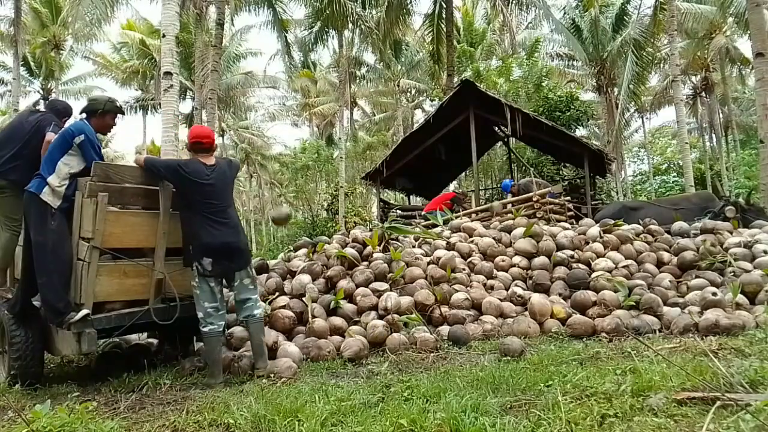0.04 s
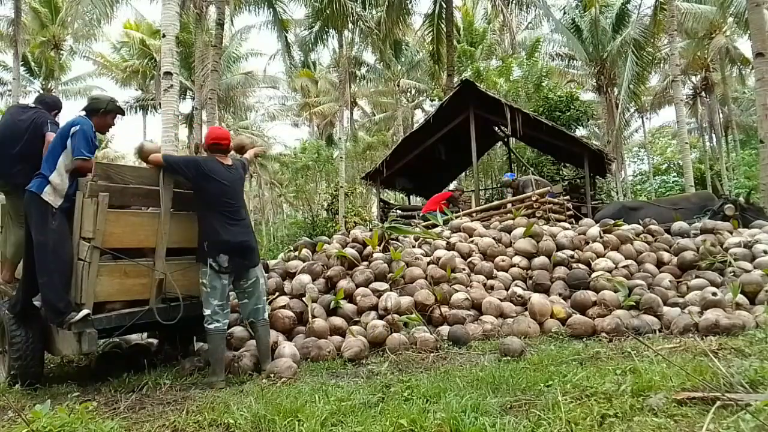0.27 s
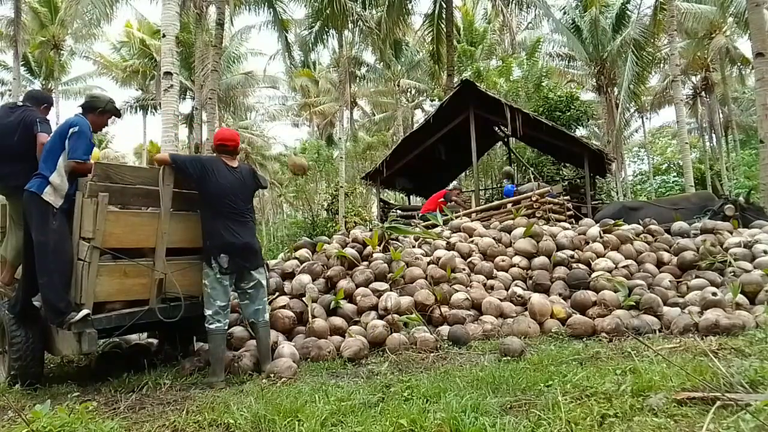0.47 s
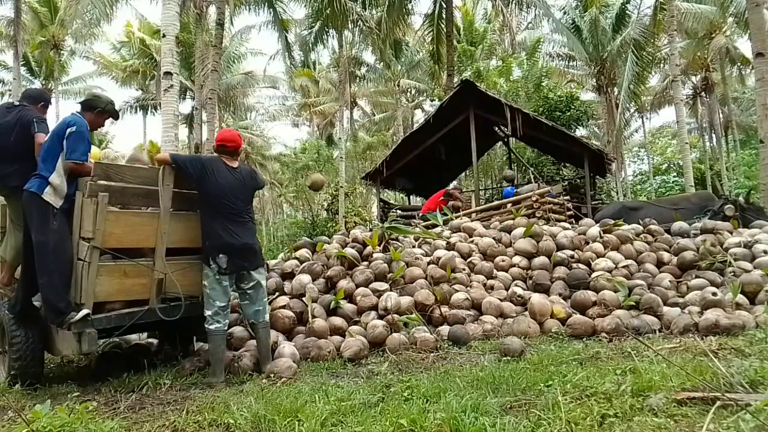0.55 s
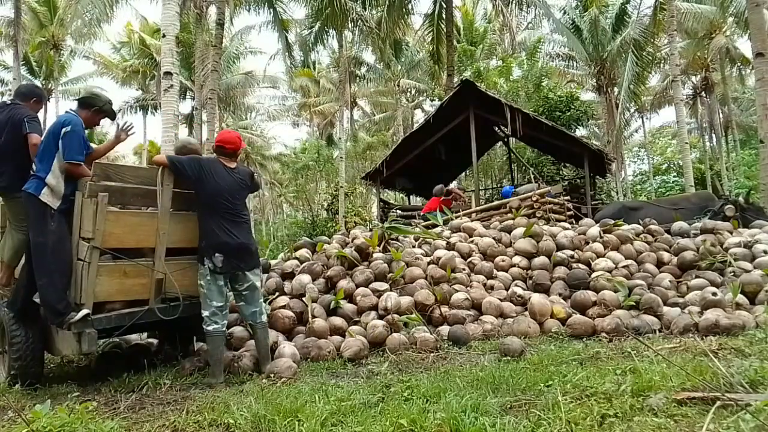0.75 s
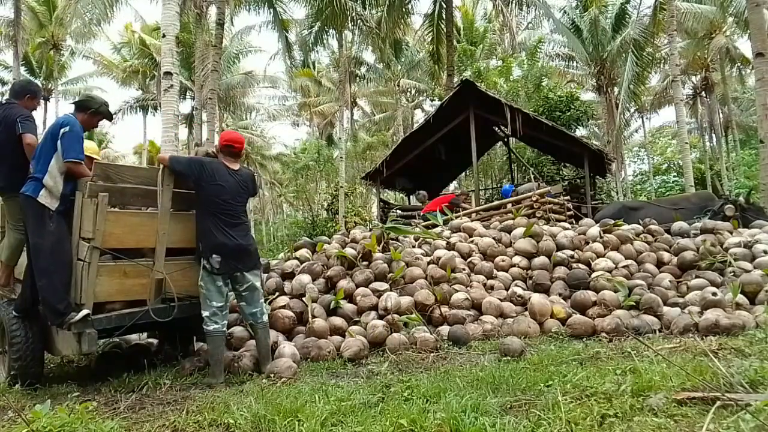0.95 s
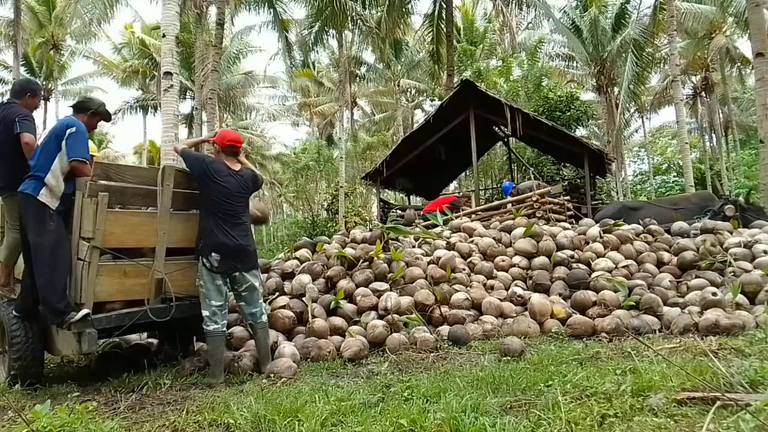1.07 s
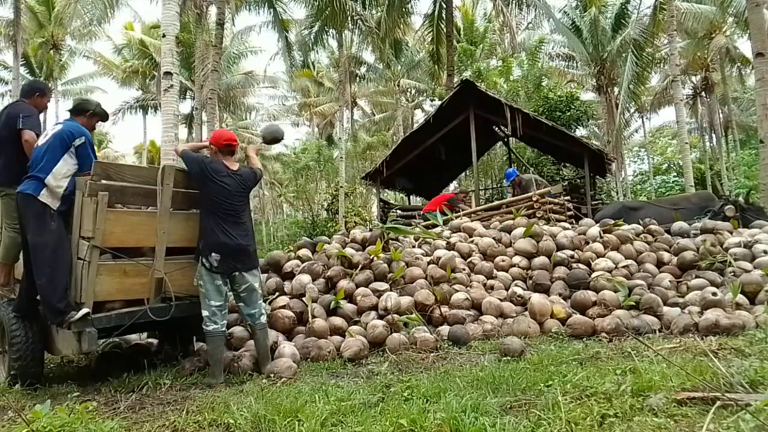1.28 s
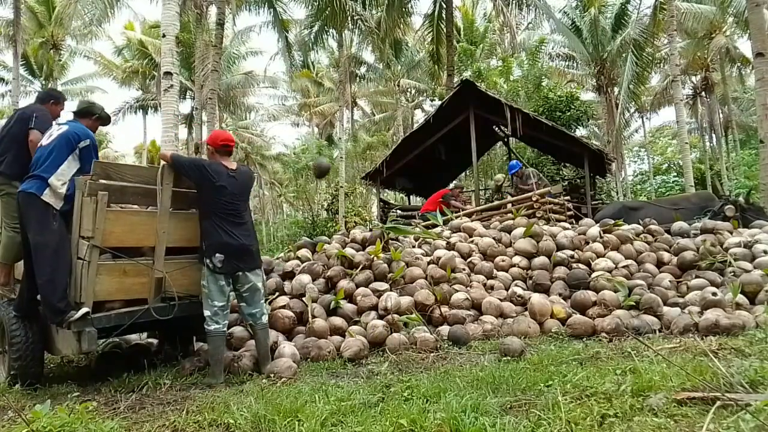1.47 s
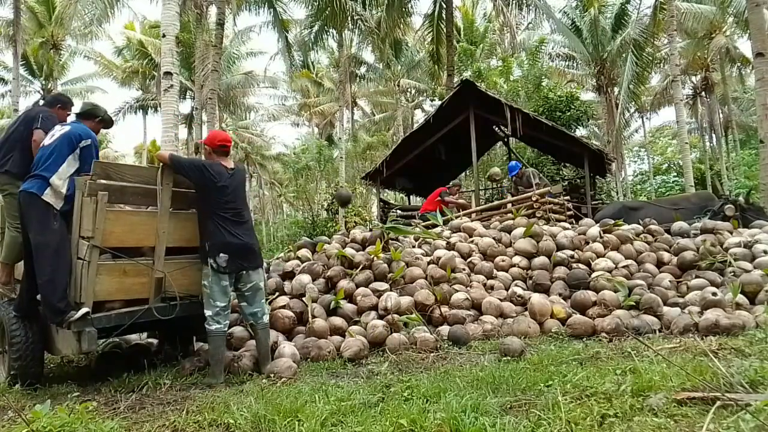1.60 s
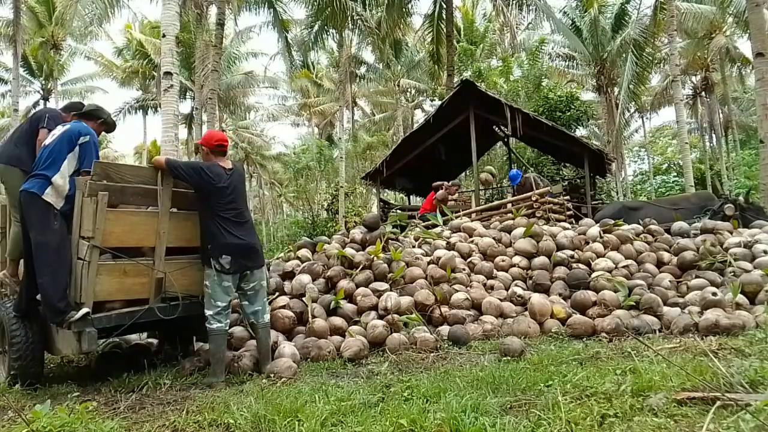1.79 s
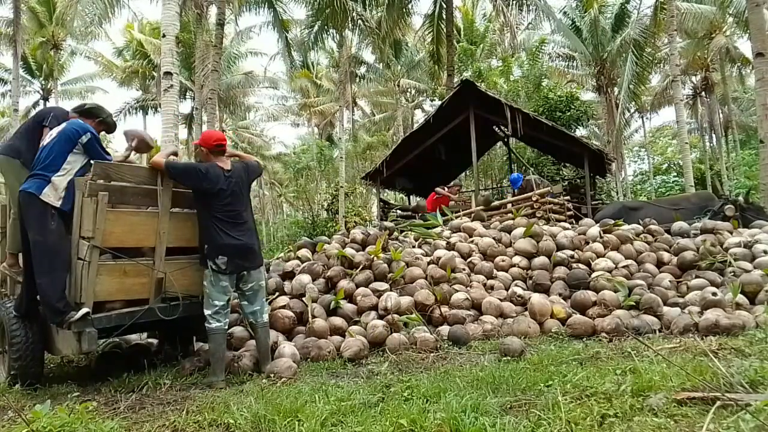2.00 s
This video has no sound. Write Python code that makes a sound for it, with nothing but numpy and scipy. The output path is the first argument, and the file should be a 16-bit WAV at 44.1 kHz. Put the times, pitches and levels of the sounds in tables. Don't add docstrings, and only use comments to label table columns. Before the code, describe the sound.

Hollow coconut knocks on a slatted wooden cart, sharp husk cracks, faint rustle and leaf hiss

```python
import sys
import numpy as np
from scipy import signal
from scipy.fft import rfft, irfft, next_fast_len
from scipy.io import wavfile
from scipy.ndimage import uniform_filter1d

SR = 44100
rng = np.random.default_rng(int(sys.argv[2]) if len(sys.argv) > 2 else 0)


def how_loud(loudness_db):
    steps = np.asarray(loudness_db, float) / 20
    return 10 ** steps


def generate_wav(signal):
    frames = np.transpose(np.atleast_2d(signal))
    scaled = np.clip(frames, -1, 1) * 32767
    pcm = np.round(scaled).astype(np.int16)
    wavfile.write(sys.argv[1], SR, pcm)


N = 90404


def unit(x):
    return x / np.sqrt(np.mean(x ** 2) + 1e-20)


def along(points, hz):
    f, value = np.transpose(points)
    return np.interp(np.log(hz + 1), np.log(f + 1), value)


def filtered(x, response):
    size = next_fast_len(N + SR // 2)
    hz = np.fft.rfftfreq(size, 1 / SR)
    return irfft(rfft(x, size) * response(hz), size)[..., :N]


def noise(spectrum, patchy_db):
    top_hz = 15950
    cells = signal.stft(rng.standard_normal(N), nperseg=512)[2]
    patches = uniform_filter1d(rng.standard_normal(cells.shape), 6, 0)
    patches = unit(uniform_filter1d(patches, 10, 1))
    x = signal.istft(cells * how_loud(patchy_db * patches), nperseg=512)[1][:N]
    return unit(filtered(x, lambda hz: how_loud(along(spectrum, hz)) * (hz < top_hz)))


def ringing(rows, modes, rise_s, gain_db, chatter_db, damp, radiates=0.77):
    detune, mode_spread_db = 0.048, 1.8
    taps_per_s, chatter_lasts = 2500, 2.09
    travel_s = 0.001079
    out, t = np.zeros(N + SR), np.arange(SR // 7) / SR
    tap_t = t[:SR // 10]
    for s, db, hz, t60 in rows:
        ring = np.zeros(len(t))
        for ratio, level_db, share in modes:
            tune, size = rng.standard_normal(2) * (ratio != 1)
            decay = how_loud(level_db + mode_spread_db * size - 60 * t / (damp * t60 * share))
            ring += decay * np.sin(2 * np.pi * hz * ratio * (1 + detune * tune) * t)
        hit, sign = rng.random((2, len(tap_t)))
        taps = (hit < taps_per_s / SR) * (2 * sign - 1)
        taps = taps * how_loud(chatter_db - 60 * tap_t / (chatter_lasts * t60))
        taps[0] = 1
        sound = signal.fftconvolve(ring * (1 - np.exp(-t / rise_s)), taps)[:len(t)]
        sound = signal.lfilter(*signal.butter(3, radiates * hz, "high", fs=SR), sound)
        out[round((s + travel_s) * SR):][:len(t)] += how_loud(db + gain_db) * sound
    return out[:N]


# time in seconds, level in dB.
SETTLING = [(0, -50), (.1, -52), (.2, -54.5), (.235, -44), (.265, -48.5), (0.299, -38), (.335, -48.5),
            (.45, -56), (.8, -75), (.86, -59), (.9, -44.5), (.97, -49.5), (1.03, -41.5), (1.12, -54.5),
            (1.25, -49), (1.4, -53), (1.75, -55.5), (2.05, -59.5)]
# frequency in Hz, level in dB.
FIBRE_COLOUR = [(100, -16), (300, -7), (700, -6), (1500, -5), (3000, -3.5), (5000, -8), (9000, -8),
                (14000, -6.5)]


def rustle():
    gain_db, growth, grain_db = -5.5, 1, 2
    s, db = np.transpose(SETTLING)
    peak_db = db.max()
    level_db = np.interp(np.arange(N) / SR, s, db)
    grain = unit(uniform_filter1d(rng.standard_normal(N), size=90))
    rubbing = unit(how_loud(grain_db * grain) * noise(FIBRE_COLOUR, patchy_db=1.1))
    return how_loud(peak_db + gain_db + growth * (level_db - peak_db)) * rubbing


# frequency in Hz, level in dB.
LEAF_COLOUR = [(45, -19), (140, 7.5), (320, 5), (1400, 3), (4100, -5), (9200, -5), (12600, -19),
               (16100, -12)]


def leaves():
    return how_loud(-53) * noise(LEAF_COLOUR, patchy_db=2.5)


# start in seconds,
# peak in dB, pitch in Hz, t60 in seconds.
SHELL_KNOCKS = [(0.021, -45.5, 856, 0.03), (0.076, -34.5, 1370, 0.03), (0.1972, -25.5, 1350, 0.05),
                (.2025, -28, 1480, 0.034), (0.207, -16, 1505, 0.024), (0.216, -39, 1740, 0.041),
                (0.2213, -16, 1430, 0.02), (0.246, -34.5, 1170, 0.025), (0.8227, -22.5, 1890, 0.02),
                (0.833, -20, 1420, 0.028), (0.961, -28, 800, 0.014), (0.9665, -30.5, 1293, 0.056),
                (1.012, -46, 1300, 0.029), (1.038, -44, 1360, 0.056), (1.262, -37.5, 1500, 0.062),
                (1.29, -25.5, 1120, 0.036), (1.293, -33, 586, 0.024), (1.316, -33, 570, 0.037),
                (1.364, -43, 1000, 0.06), (1.669, -33.5, 950, 0.035), (1.7645, -32, 1210, 0.065),
                (1.769, -32, 1495, 0.041), (1.806, -38, 1370, 0.056), (1.929, -39.5, 900, 0.041),
                (2.038, -34, 1120, 0.03),
                (0.2066, -17, 2640, 0.02), (0.2214, -25, 2710, 0.022), (0.8227, -23, 3160, 0.012),
                (.8326, -25.5, 2500, 0.025), (0.967, -30, 2530, 0.03), (1.7645, -32, 2600, 0.04),
                (1.663, -34.5, 840, 0.048), (1.771, -36.5, 604, 0.042), (0.362, -43, 1480, 0.028),
                (1.247, -43.5, 1530, 0.074), (1.2917, -28, 2900, 0.021), (1.2923, -29, 4150, 0.026)]
# ratio to the pitch, level in dB, share of t60.
SHELL_MODES = [(1, -1.5, 1), (1.189, -3, 0.88), (1.42, -4.5, 0.49), (1.9, -10.5, 1)]


def knocks():
    return ringing(SHELL_KNOCKS, SHELL_MODES, rise_s=0.000092, gain_db=-4.5,
                   chatter_db=-4.5, damp=0.34)


# frequency in Hz, t60 in seconds.
GROVE_DECAY = [(150, 0.26), (1500, 0.67), (4000, 0.91), (10000, 0.73)]


def grove(x):
    delay_s = 0.012
    out, size = np.zeros(N + SR), SR // 12
    bursts = rng.standard_normal((N // size + 1, SR // 3))
    hz, t, cells = signal.stft(bursts, SR, nperseg=256)
    decay = how_loud(-60 * t / along(GROVE_DECAY, hz)[:, None])
    tails = signal.istft(cells * decay, SR, nperseg=256)[1]
    for k, tail in enumerate(tails):
        echo = signal.fftconvolve(x[k * size:][:size], tail / np.linalg.norm(tail))
        out[k * size + round(delay_s * SR):][:len(echo)] += echo
    return how_loud(-14.5) * out[:N]


# start in seconds, peak in dB, pitch in Hz, t60 in seconds.
PLANK_THUDS = [(0.074, -39.5, 220, 0.04), (0.2192, -33, 149, 0.04), (0.249, -48, 210, 0.06),
               (0.294, -46, 152, 0.065), (0.673, -47, 267, 0.11), (0.8222, -34.5, 149, 0.046),
               (0.833, -31, 269, 0.046), (0.896, -49.5, 208, 0.16), (0.9612, -40, 205, 0.04),
               (.9635, -34, 165, 0.049), (0.99, -40, 270, 0.059), (1.263, -41.5, 301, 0.073),
               (1.289, -35, 224, 0.035), (1.308, -39, 228, 0.053), (1.334, -40, 203, 0.039),
               (1.354, -44, 188, 0.046), (1.413, -48, 263, 0.11), (1.455, -47.5, 236, 0.058),
               (1.663, -45, 264, 0.11), (1.684, -40, 322, 0.061), (1.764, -41, 212, 0.057),
               (1.805, -45.5, 332, 0.033), (1.873, -43.5, 217, 0.047), (1.888, -46, 241, 0.045),
               (1.925, -50, 131, 0.056)]
# ratio to the pitch, level in dB, share of t60.
PLANK_MODES = [(1, 1, 0.83), (1.52, -9, 0.97), (2.38, -12.5, 0.78), (0.762, -9.5, 1.7)]


def thuds():
    return ringing(PLANK_THUDS, PLANK_MODES, rise_s=0.00073, gain_db=2.5,
                   chatter_db=-16.0, damp=0.96, radiates=0.49)


# start in seconds, peak in dB, t60 in seconds, lowest frequency in Hz.
HUSK_SNAPS = [(0.076, -34, 0.0185, 1500), (.1984, -32, 0.01, 3000), (.2079, -1, 0.0024, 1500),
              (.2086, -10.5, .012, 2470), (0.2127, -19, 0.012, 5000), (.2148, -18.5, 0.016, 4000),
              (0.22, -22, .01, 6000), (0.2216, -24, 0.027, 6000), (.247, -38, .015, 6500),
              (0.8238, -14, 0.0051, 1490), (0.8238, -18, .018, 2510), (0.8274, -29, 0.034, 7000),
              (0.8343, -26, 0.012, 1500), (0.8359, -21.5, 0.011, 6500), (.8367, -19, .014, 7000),
              (0.962, -33, 0.04, 2500), (0.9673, -27, .012, 2500), (.969, -27.5, 0.015, 1510),
              (0.972, -31, .04, 4000), (1.2321, -20, 0.013, 7200), (1.2329, -23, 0.016, 7200),
              (1.2371, -25, 0.012, 7000), (1.24, -29, 0.017, 6800), (1.2704, -22, 0.014, 3600),
              (1.291, -25, 0.062, 2950), (1.2932, -21.5, 0.013, 3000), (1.2946, -27, 0.0086, 3000),
              (1.296, -25.5, .025, 3500), (1.3192, -30, 0.008, 5500), (1.7654, -27.5, 0.023, 1510),
              (1.77, -33.5, 0.078, 1500), (1.799, -35, 0.021, 6000), (1.807, -34, 0.021, 2000),
              (2.04, -36, 0.018, 1500)]
# frequency in Hz, level in dB.
SNAP_COLOUR = [(300, -29), (1500, -2), (3500, 5.5), (5000, -8), (9000, 3.5), (11000, -5), (13500, -6.5),
               (17000, -7)]


def snaps():
    gain_db, break_db = -10, 11
    out, t = np.zeros(N + SR), np.arange(SR // 10) / SR
    for s, db, t60, low_hz in HUSK_SNAPS:
        burst = rng.standard_normal(len(t)) * how_loud(-60 * t / t60)
        burst[0] += how_loud(break_db)
        high_pass = signal.butter(3, low_hz, "high", fs=SR, output="sos")
        thin = signal.sosfilt(high_pass, burst)
        out[round(s * SR):][:len(t)] += how_loud(db + gain_db) * thin
    return filtered(out[:N], lambda hz: how_loud(along(SNAP_COLOUR, hz)))


# start in seconds, peak in
# dB, pitch in Hz, t60 in seconds.
HELD_NOTES = [(.198, -37, 1460, 0.047), (.207, -19, 1530, 0.022), (.207, -19, 1900, 0.02),
              (.206, -27, 1170, 0.033), (.216, -28.5, 1800, .03), (.2215, -41.5, 375, .11),
              (.295, -38.5, 295, 0.094), (.308, -45.5, 152, 0.24), (.2066, -17, 3380, 0.015),
              (.222, -29, 2950, 0.02), (.8224, -23.5, 3780, 0.01), (.8228, -29, 5500, 0.0089),
              (.8325, -31, 5000, 0.011), (1.668, -42.5, 1010, 0.043), (1.385, -52, 290, .06),
              (1.011, -49, 1295, 0.13), (1.2915, -23.5, 1115, 0.027), (1.291, -28.5, 1500, 0.034),
              (1.291, -35, 1950, 0.037), (1.293, -28.5, 607, 0.055), (1.6, -43.5, 570, 0.032),
              (1.333, -46, 1060, 0.054), (1.17, -50, 856, .08)]
# ratio to the pitch, level in dB, share of t60.
HELD_MODES = [(1, 2.5, 0.97), (1.21, -18, 0.84)]


def held_notes():
    return ringing(HELD_NOTES, HELD_MODES, rise_s=0.00094, gain_db=1.24, chatter_db=-24, damp=1.0)


# start in seconds, peak in dB, rise in seconds.
BED_PUSHES = [
    (0.2207, -34, .0008),
    (0.8232, -31, .0008),
    (0.8332, -32.5, .0006),
    (.9623, -26, 0.00083),
    (1.2634, -39, 0.001),
    (1.2902, -35.5, 0.00076),
    (1.7654, -42, .0006),
    (1.655, -44.5, .0007),
]


def pushes():
    out, t = np.zeros(N + SR), np.arange(SR // 50) / SR
    for s, db, rise_s in BED_PUSHES:
        shove = t / rise_s * np.exp(1 - t / rise_s)
        out[round(s * SR):][:len(t)] += how_loud(db) * shove
    return out[:N]


# time in seconds, pitch in Hz, level in dB before the microphone.
BIRD_CHIRP = [
    (1.509, 8470, -79),
    (1.513, 8250, -63),
    (1.521, 7800, -56),
    (1.533, 7700, -57),
    (1.538, 7760, -79),
]


def bird():
    s, hz, db = np.transpose(BIRD_CHIRP)
    t = np.arange(N) / SR
    phase = 2 * np.pi * np.cumsum(np.interp(t, s, hz)) / SR
    return how_loud(np.interp(t, s, db, -150, -150)) * np.sin(phase)


def scene():
    landings = knocks() + thuds() + snaps() + pushes()
    notes = held_notes()
    echo = grove(landings + how_loud(-5.5) * notes)
    mix = landings + notes + echo + rustle() + leaves() + bird()
    return mix[None]


def roll_off(x):
    return signal.sosfilt(signal.butter(12, 16810, fs=SR, output="sos"), x)


def record(dry):
    port_hz, port_width_hz, roll_hz = 9190, 2150, 11560
    low_cut_hz, leak_db, top_hz = 104, -33, 16800

    def microphone(f):
        port = port_hz ** 2 / (port_hz ** 2 - f * f + 1j * f * port_width_hz)
        port = port / (1 + 1j * f / roll_hz)
        cut = (-f * f / (low_cut_hz ** 2 - f * f + 1.4j * f * low_cut_hz)) ** 3
        return port * (cut + how_loud(leak_db)) * (f < top_hz)

    rumble = how_loud(-78.5) * noise([(20, -3), (100, -5), (3000, -12)], patchy_db=1.5)
    return roll_off(filtered(dry, microphone) + rumble)


dry = scene()
out = record(dry)
generate_wav(out)
```